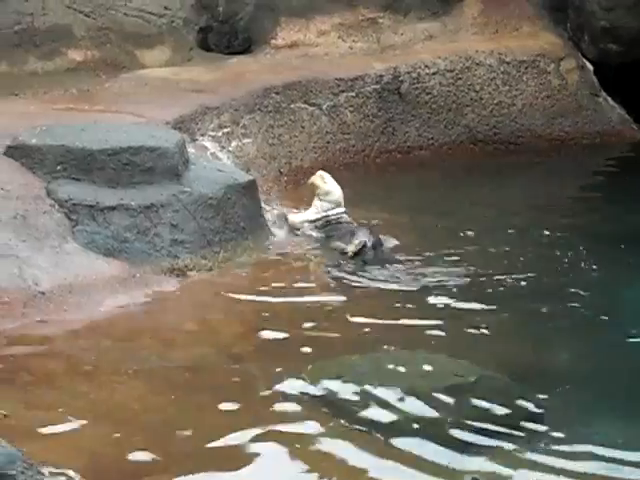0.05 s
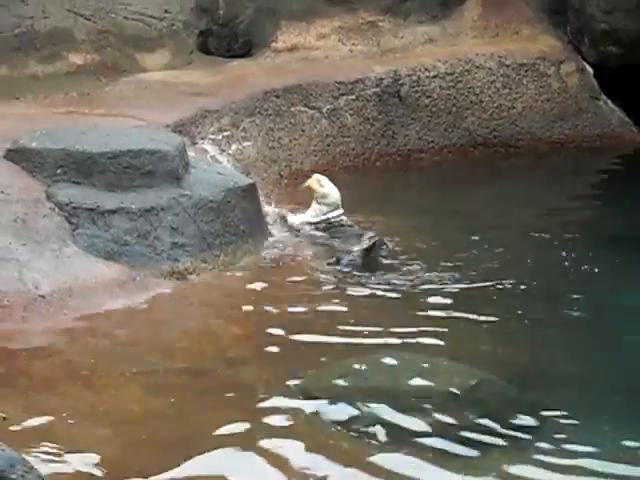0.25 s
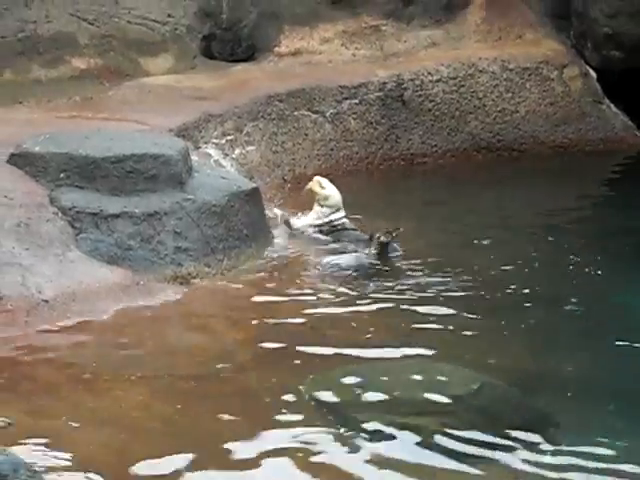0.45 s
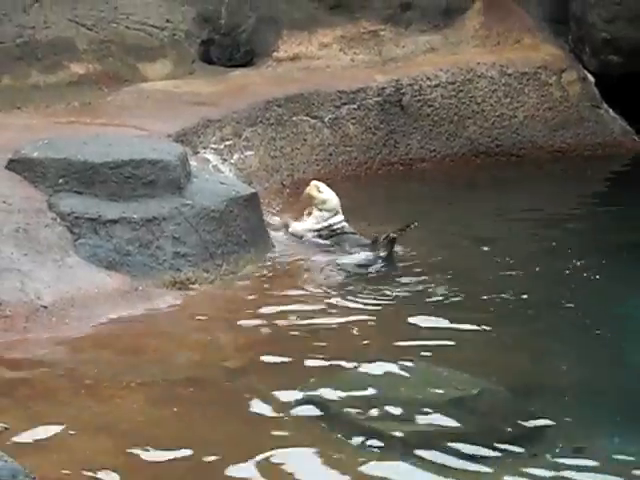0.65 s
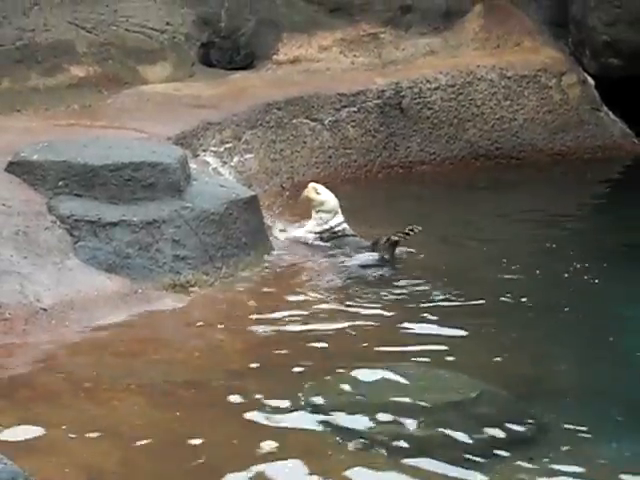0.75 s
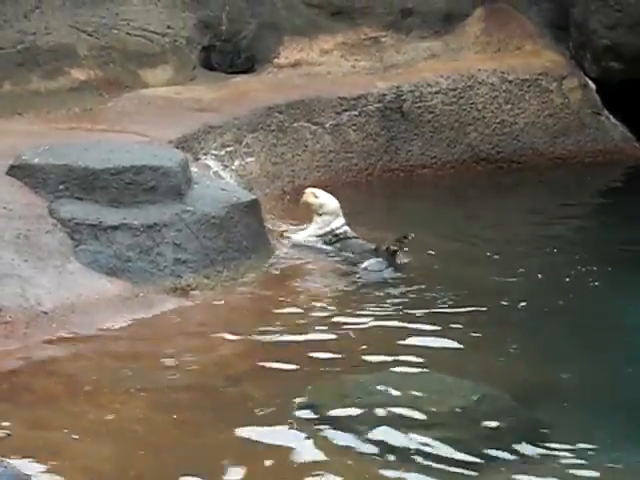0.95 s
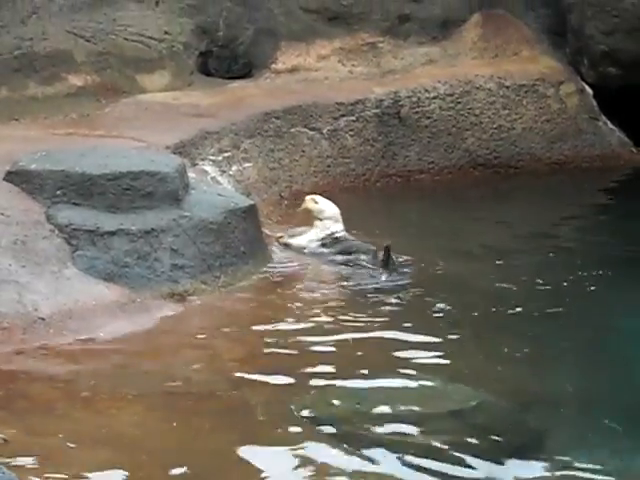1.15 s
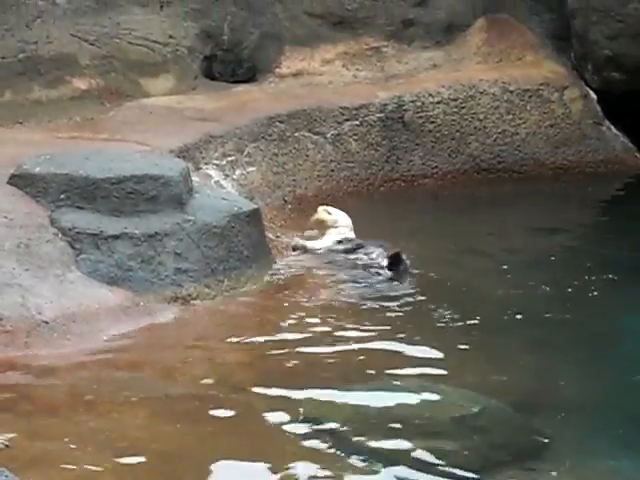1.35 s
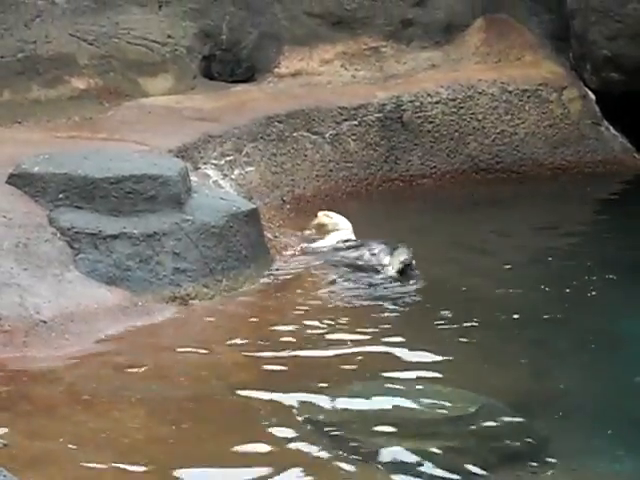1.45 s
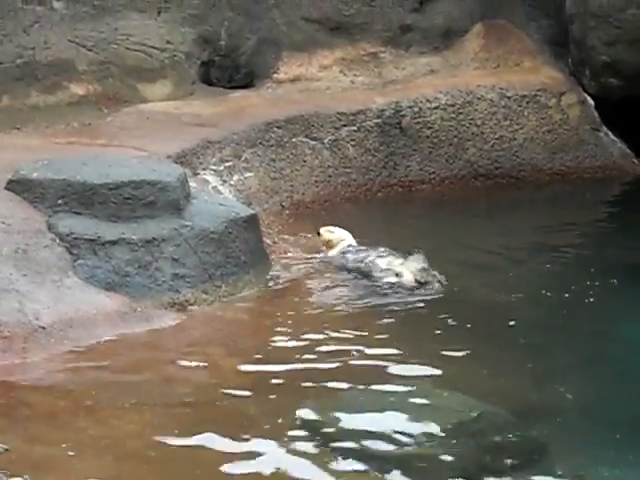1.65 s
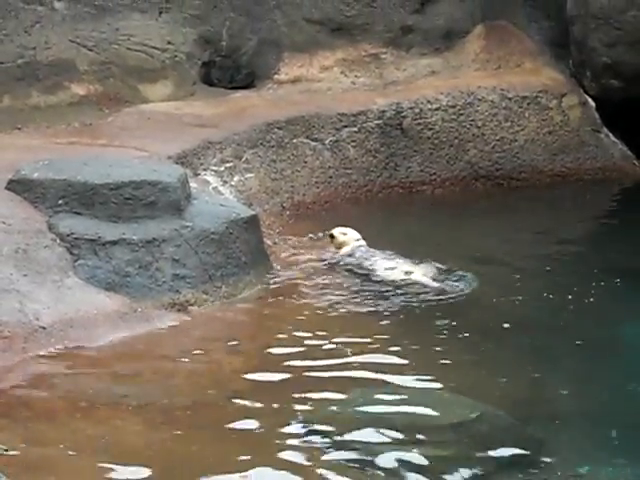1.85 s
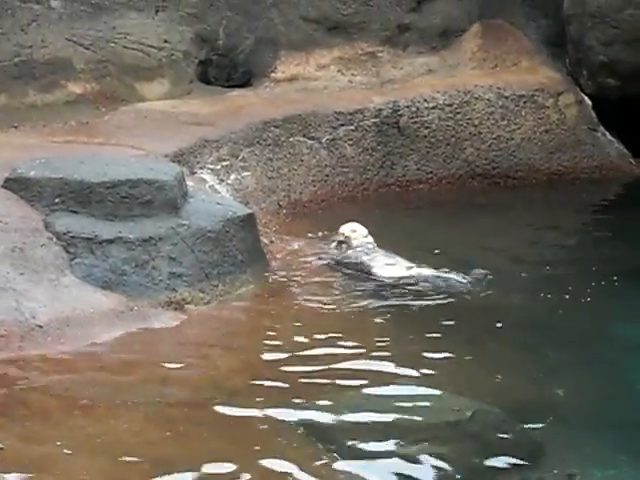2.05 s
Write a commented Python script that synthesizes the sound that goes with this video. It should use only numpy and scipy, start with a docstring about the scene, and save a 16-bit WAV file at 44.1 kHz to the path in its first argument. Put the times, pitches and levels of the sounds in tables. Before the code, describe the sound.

Five sharp, hollow knocks of shell on stone at a rocky pool, then small splashes

```python
"""A pump hums under a soft wash of water as the whole sound fades in: wavering sines over filtered noise.
A sea otter afloat in a rocky pool then bangs a shell against the stone edge five times. Each knock is
a dry crack with a short hollow ring that changes with the grip: dispersed clicks and noise bursts through
resonant filters. The rock walls throw each back at once, as noise echoes with a diffuse tail.
Last the otter rolls away with small splashes, made of decaying bubble tones and ticks of noise."""
import sys
import numpy as np
from scipy import signal
from scipy.fft import rfft, irfft, next_fast_len
from scipy.io import wavfile
from scipy.ndimage import uniform_filter1d, map_coordinates

SR = 44100
rng = np.random.default_rng(int(sys.argv[2]) if len(sys.argv) > 2 else 0)


def master(y):
    """Save y as 16-bit WAV."""
    cut = np.clip(np.atleast_2d(y).T, -1, 1)
    pcm = np.round(cut * 32767)  # scale
    wavfile.write(sys.argv[1], SR, pcm.astype(np.int16))


N = 92610

# Level of the whole sound as it fades in: (time [s], level [dB])
FADE_IN_LEVEL = [(0, -64), (0.039, -32), (0.118, -19.5), (0.178, -3.5), (0.208, 3)]
# Spectrum of the water wash, relative: (frequency [Hz], density [dB per Hz])
WASH_SPECTRUM = [(20, -28.5), (30, -22), (42, -9.5), (53, -8), (66, -9.5), (86, -1.5), (105, -6), (128, -4),
                 (165, -7.5), (215, -12.5), (290, -15.5), (400, -17), (540, -20), (741, -16.5),
                 (1200, -22.5), (2000, -29), (2770, -32), (3530, -31.5), (5010, -38), (9000, -42),
                 (15500, -46.5)]
# Pump tones: (frequency [Hz], level [dB], random pitch wander [Hz])
PUMP_TONES = [(83.3, -51.5, 2.934), (118.1, -55.5, 1.507)]
# Colour of the wall echoes: (frequency [Hz], gain [dB])
WALL_GAIN = [(200, 2.5), (550, -1.5), (900, 2), (1900, -3.5), (3200, -0.5), (8000, 1.5), (15000, 0.5)]
# Colour of the diffuse tail: (frequency [Hz], gain [dB])
TAIL_GAIN = [(200, 6), (800, 3), (1800, -4.5), (3500, -1.5), (8000, -2.5), (15000, -3)]
# Time the diffuse tail takes to fall 60 dB: (frequency [Hz], decay time [s])
TAIL_DECAY = [(200, 0.48), (800, 0.43), (1500, 0.55), (3500, 0.47), (8000, 0.51), (15000, 0.26)]
# Level of the stirred water: (time [s], level [dB])
SLOSH_LEVEL = [(1.15, -71), (1.28, -60), (1.4, -72.5), (1.52, -64), (1.61, -65.5), (1.68, -55.5),
               (1.74, -64), (1.79, -61), (1.88, -73), (2.1, -68)]
# Drips and plops: (time [s], level [dB], bubble frequency [Hz], bubble 60 dB decay time [s],
#                   splash tick before halving [dB])
DROPS = [(1.053, -50.5, 11540, 0.0042, 4.5), (1.262, -49, 3350, .015, -3), (1.291, -51.5, 4600, 0.013, 2),
         (1.555, -48, 1460, .02, -12), (1.6003, -45, 3610, .03, 7), (1.657, -64, 7400, .01, 3),
         (1.6975, -41, 2480, 0.01, -4), (1.744, -48, 6460, 0.0089, -5), (1.771, -44, 3550, 0.012, -0.5),
         (1.777, -45, 2100, .015, 7.5), (1.805, -43, 5730, 0.0098, 8.5), (1.842, -49, 4520, 0.0138, -8),
         (1.8535, -41, 2310, 0.013, -12)]
# Colour of the splash of a drop: (frequency [Hz], gain [dB])
TICK_GAIN = [(500, -24), (2200, 0), (4500, 8), (6000, 4), (9000, -5), (15000, -14)]
# Shell on stone: (time [s], level [dB], hollow ring [Hz], its lift [dB], its width [octaves],
#                  upper ring [Hz], its lift [dB], its lift in the echo [dB], bass [dB], treble [dB],
#                  graze [dB], chatter [dB], walls [dB])
SHELL_KNOCKS = [(0.2178, 0, 2050, 9.5, 0.35, 3580, 6, 9, 2.5, -2, -15, -0.5, -3.5),
                (.4189, -1.5, 791.4, 12, 0.48, 3000, 9.5, 5.5, 6, 3.5, -10.5, -10, -0.5),
                (0.6146, -1.5, 3650, 4.5, 0.23, 5300, 4, 2.5, 3.5, 3.5, -20, 9, 0),
                (0.8126, -0.15, 1000, 4, 0.485, 2050, 7, 11, -4, -1.5, -20, 1, .5),
                (1.0031, -4.5, 1420, 10.5, 0.061, 1790, 12, 5, -15, -5.5, -1.5, 12, -2)]
# Colour of every knock before its rings and tone: (frequency [Hz], gain [dB])
SHELL_GAIN = [(60, -33), (200, -13.5), (500, -2), (900, -2.5), (1500, -3), (2600, -2), (4500, -4.5),
              (7000, -11), (10000, -15), (15500, -18.5)]

# Levels in dB, times in s, frequencies in Hz; T60 is the time to fall 60 dB
TOP_HZ = 15900  # upper band limit
WASH_DB, WASH_PATCHY_DB = -47, 0.92
HUM_FLUTTER_DB = 1.5
WALL_S, WALL_SPREAD_S, WALL_DB = 0.02, 0.0052, 0.8  # cluster of echoes from the rock walls
WALL_RAGGED_DB, WALL_FACETS_PER_S = 2.6, 600  # uneven rock faces return sound in lumps
TAIL_DB, TAIL_RISE_S = -1.95, 0.02
SPRAY_PER_S = 1600
SPRAY_HZ, SPRAY_SPREAD = 3660, 0.485  # median pitch; logistic spread of its logarithm
SPRAY_CYCLES, SPRAY_SCATTER_DB = 14.5, 2.5  # cycles to fall 60 dB; mean random boost, nearly
BUBBLE_RISE_PER_S, TICK_T60, DRIP_WET_DB = 4.7, 0.00786, -8  # rise is a share of the pitch
KNOCK_DB = 2.5
GRAZE_S, CHATTER_T60 = 0.0028, 0.023  # the shell grazes the stone, lands, then chatters
BEND_S, BEND_HZ = 0.000791, 1478  # bending waves: delay at this pitch; lower ones arrive later
NEAR_DB, NEAR_T60 = -6.5, 0.047  # scatter from the stone and water close by
BASS_HZ, TREBLE_HZ = 554, 5300  # where the bass and the treble begin
UPPER_OCTAVES = 0.17  # width of the upper ring
RING_IN_ECHO = 0.876  # share of the hollow ring's dB lift radiated towards the walls


def amp(db):
    """Logarithmic level: 20 dB is a tenfold amplitude."""
    return 10 ** (np.asarray(db) / 20)


def unit(x):
    """Normalisation of mean power: x scaled to rms 1."""
    return x / np.sqrt(np.mean(x ** 2) + 1e-20)


def burst(envelope):
    """Random impact: noise of energy 1 under an envelope."""
    x = envelope * rng.standard_normal(len(envelope))
    return x / (np.linalg.norm(x) + 1e-20)


def along(points, hz):
    """Logarithmic pitch: (Hz, value) points interpolated on a log axis."""
    f, v = np.transpose(points)
    return np.interp(np.log(hz + 1), np.log(f + 1), v)


def wobble(rate, size=N):
    """Band-limited fluctuation: a smooth random curve with rate knots a second."""
    knots = rng.standard_normal(SR // 20)
    return map_coordinates(knots, [np.arange(size) * rate / SR], mode="mirror")


def coloured(x, db_at):
    """Minimum-phase filtering: a causal response whose gain in dB is a function of frequency."""
    m = 2 * next_fast_len(len(x) // 2 + SR // 20, True)
    gain = amp(db_at(np.fft.rfftfreq(m, 1 / SR)))
    # folding the cepstrum onto positive times makes the response causal
    cepstrum = irfft(np.log(gain), m)
    cepstrum[1:m // 2] *= 2
    cepstrum[m // 2 + 1:] = 0
    response = np.exp(rfft(cepstrum))
    return irfft(rfft(x, m) * response, m)[:len(x)]


def add(track, s, x):
    """Superposition: mixes x into the track at time s."""
    start = round(s * SR)
    track[start:start + len(x)] += x[:N - start]


def wash():
    """Broadband flow noise: distant rumble and running water, in gently shifting patches."""
    z = signal.stft(rng.standard_normal(N), nperseg=512)[2]
    field = rng.standard_normal(z.shape)
    field = uniform_filter1d(field, size=6, axis=0)  # smooth over frequency
    field = uniform_filter1d(field, size=10, axis=1)  # smooth over time
    noise = signal.istft(z * amp(WASH_PATCHY_DB * unit(field)), nperseg=512)[1][:N]
    return amp(WASH_DB) * unit(coloured(noise, lambda f: along(WASH_SPECTRUM, f)))


def pump():
    """Frequency and amplitude modulation: low machine tones that waver in pitch and level."""
    hum = np.zeros(N)
    for hz, db, wander_hz in PUMP_TONES:
        cycles = np.cumsum(hz + wander_hz * wobble(8)) / SR
        flutter = amp(HUM_FLUTTER_DB * wobble(12.062))
        hum += amp(db) * unit(np.sin(2 * np.pi * cycles) * flutter)
    return hum


def enclosure(t):
    """Reverberation: a click at t = 0 returns as ragged wall echoes and a diffuse decaying tail."""
    facets = amp(WALL_RAGGED_DB * wobble(WALL_FACETS_PER_S, size=len(t)))
    cluster = 1 / np.cosh(np.clip((t - WALL_S) / WALL_SPREAD_S, -20, 20))
    walls = burst(facets * (t > 0) * cluster)

    # each frequency band of the tail dies at its own rate
    hz, s, z = signal.stft(rng.standard_normal(len(t)), SR, nperseg=256)
    decay = amp(-60 * s / along(TAIL_DECAY, hz)[:, None])
    tail = signal.istft(z * decay, SR, nperseg=256)[1][:len(t)]
    tail = tail * np.clip(t / TAIL_RISE_S, 0, 1)
    tail = tail / np.linalg.norm(tail)

    walls = amp(WALL_DB) * coloured(walls, lambda f: along(WALL_GAIN, f))
    return walls + amp(TAIL_DB) * coloured(tail, lambda f: along(TAIL_GAIN, f))


def slosh():
    """Bubble resonance in numbers: many tiny bubbles burst in the water that the otter stirs."""
    draws = rng.random((int(SPRAY_PER_S * N / SR), 3))
    place, pitch, strength = draws[:, :1], draws[:, 1:2], draws[:, 2:]
    t = np.arange(SR // 100) / SR
    hz = np.clip(SPRAY_HZ * (pitch / (1 - pitch)) ** (SPRAY_SPREAD / 2), 500, TOP_HZ)
    boost_db = -SPRAY_SCATTER_DB * np.log(np.maximum(strength, 0.02))
    grains = amp(boost_db - 60 * t * hz / SPRAY_CYCLES) * np.sin(2 * np.pi * hz * t)
    samples = (place * N).astype(int) + np.arange(len(t))
    spray = unit(np.bincount(samples.ravel(), grains.ravel(), N)[:N])
    return spray * amp(np.interp(np.arange(N) / SR, *np.transpose(SLOSH_LEVEL)))


def drips():
    """Bubble resonance: each drop ticks on the surface and leaves a bubble whose pitch rises."""
    out, t = np.zeros(N), np.arange(SR // 10) / SR
    for s, db, hz, t60, tick_db in DROPS:
        cycles = hz * t * (1 + BUBBLE_RISE_PER_S * t / 2)
        bubble = np.sin(2 * np.pi * cycles) * amp(-60 * t / t60)
        splash = unit(coloured(rng.standard_normal(len(t)), lambda f: along(TICK_GAIN, f)))
        tick = splash * amp(-60 * t / TICK_T60)
        add(out, s, amp(db) * (bubble + amp(tick_db) * tick / 2))
    return out


def blow(t):
    """Dispersion: a click at t = 0 is smeared as it bends its way through the shell."""
    f = np.fft.rfftfreq(len(t), 1 / SR)
    cycles = f * t[0] - 2 * BEND_S * np.sqrt(f * BEND_HZ)
    return irfft(np.exp(2j * np.pi * cycles), len(t))


def resonance(f, hz, octaves):
    """Resonance: a peak of height 1 that falls to half at the given octaves to either side."""
    return 1 / (1 + (np.log2((f + 1) / hz) / octaves) ** 2)


def dying(t, t60):
    """Exponential decay: a noise burst that starts after t = 0."""
    return burst(amp(-60 * np.abs(t) / t60) * (t > 0))


def knocks():
    """Forced resonance: graze, blow and chatter ring the gripped shell at two broad peaks; walls answer."""
    out, lead = np.zeros(N), round(GRAZE_S * SR)
    t = (np.arange(SR // 2) - lead) / SR  # the blow lands at t = 0
    for (s, db, low_hz, low_db, octaves, high_hz, high_db, high_echo_db,
         bass_db, treble_db, graze_db, chatter_db, walls_db) in SHELL_KNOCKS:
        graze = amp(graze_db) * burst((t < 0) * (t - t[0]))
        strike = blow(t) + amp(chatter_db) * dying(t, CHATTER_T60)
        strike = strike / np.hypot(1, amp(chatter_db))
        near = amp(NEAR_DB) * dying(t, NEAR_T60)

        def shell(f):
            """Spectral balance: the shell's colour with bass and treble shelves."""
            treble = treble_db * f ** 2 / (f ** 2 + TREBLE_HZ ** 2)
            bass = bass_db * BASS_HZ ** 2 / (f ** 2 + BASS_HZ ** 2)
            return along(SHELL_GAIN, f) + treble + bass

        def rings(f, hollow_db, upper_db):
            """Superposed resonances: the hollow and upper rings, in dB."""
            hollow = hollow_db * resonance(f, low_hz, octaves)
            return hollow + upper_db * resonance(f, high_hz, UPPER_OCTAVES)

        direct = coloured(graze + strike + near, lambda f: shell(f) + rings(f, low_db, high_db))
        echo = coloured(enclosure(t),
                        lambda f: shell(f) + rings(f, RING_IN_ECHO * low_db, high_echo_db))
        add(out, s - lead / SR, amp(KNOCK_DB + db) * (direct + amp(walls_db) * echo))
    return out


def scene():
    """Superposition: knocks and water sounds in the enclosure, over wash and pump."""
    water = drips() + slosh()
    echo = signal.fftconvolve(water, enclosure(np.arange(SR // 2) / SR))[:N]
    return (wash() + pump() + water + amp(DRIP_WET_DB) * echo + knocks())[None]


def record(dry):
    """Gain and band limiting: the sound fades in, and nothing is kept from the band limit up."""
    faded = dry * amp(np.interp(np.arange(N) / SR, *np.transpose(FADE_IN_LEVEL)))
    m = next_fast_len(N + SR // 2)
    passband = np.fft.rfftfreq(m, 1 / SR) < TOP_HZ
    return irfft(rfft(faded, m) * passband, m)[..., :N]


dry = scene()
out = record(dry)
master(out)
```